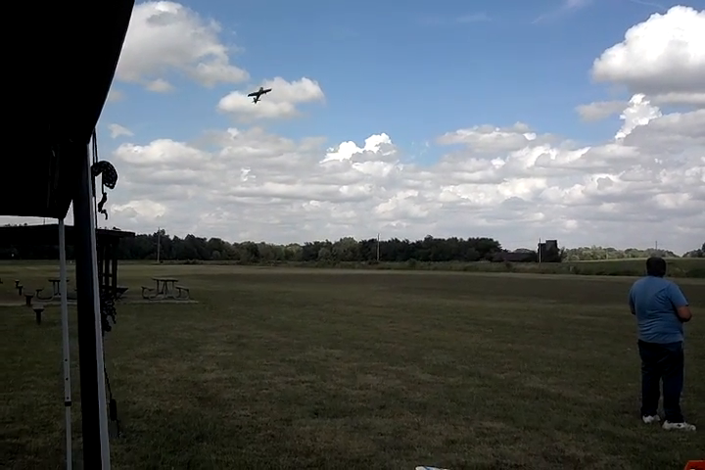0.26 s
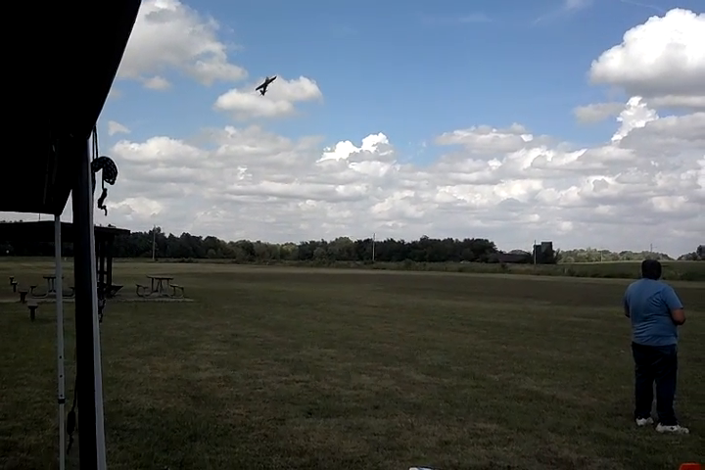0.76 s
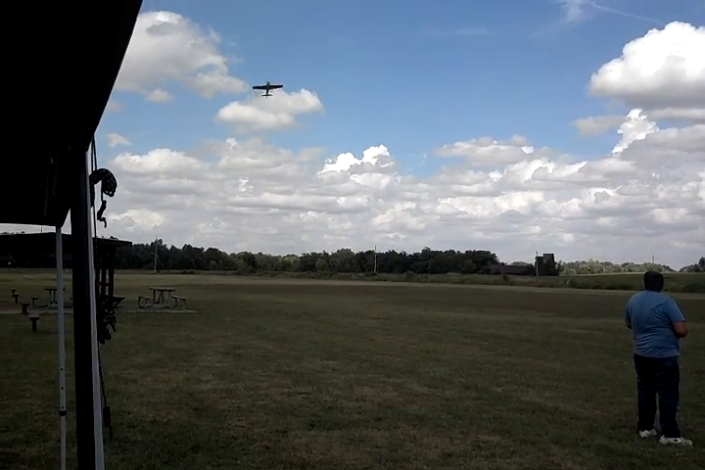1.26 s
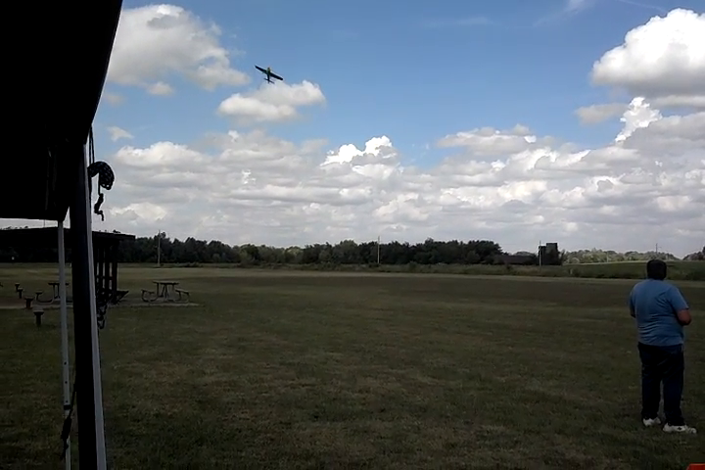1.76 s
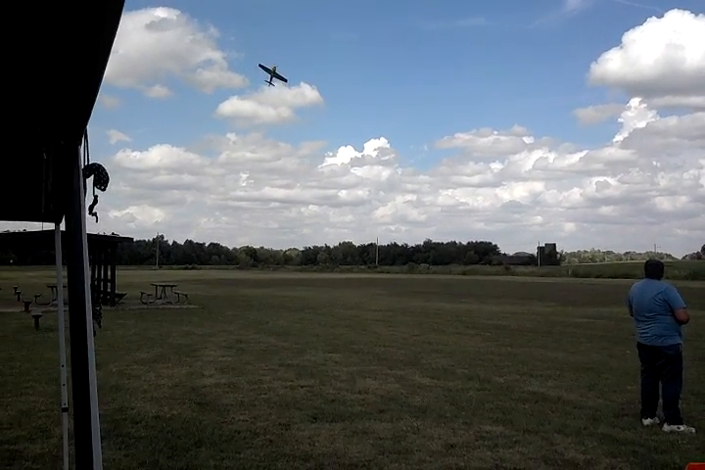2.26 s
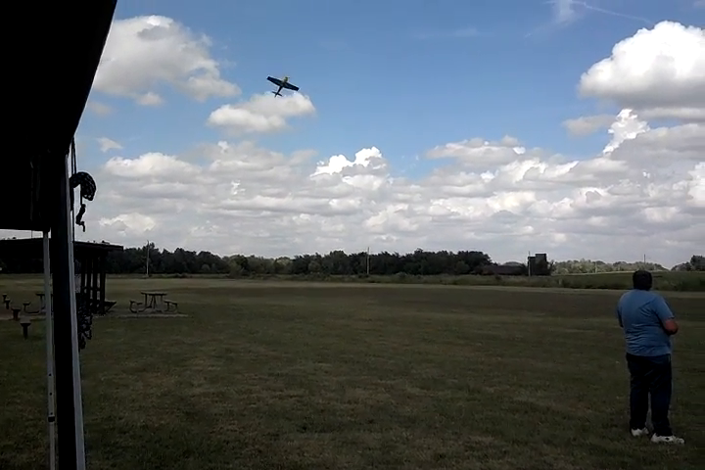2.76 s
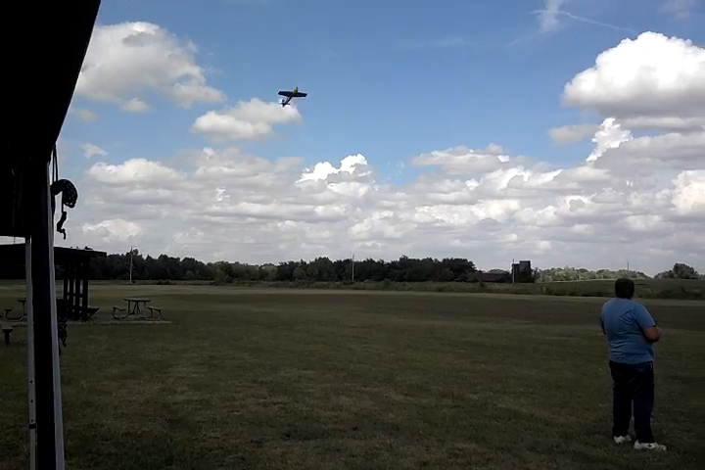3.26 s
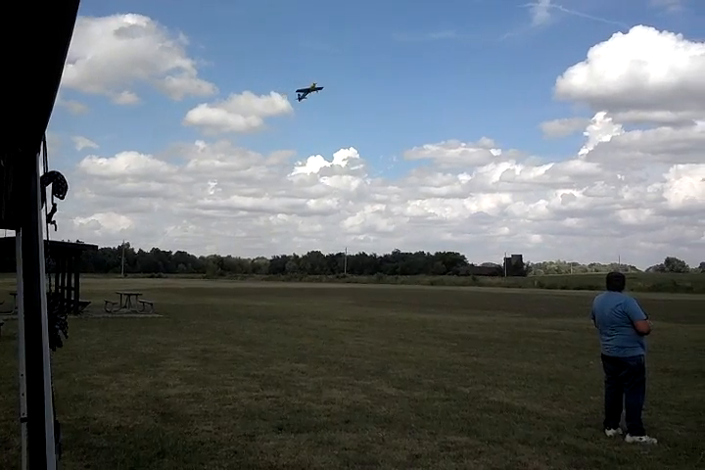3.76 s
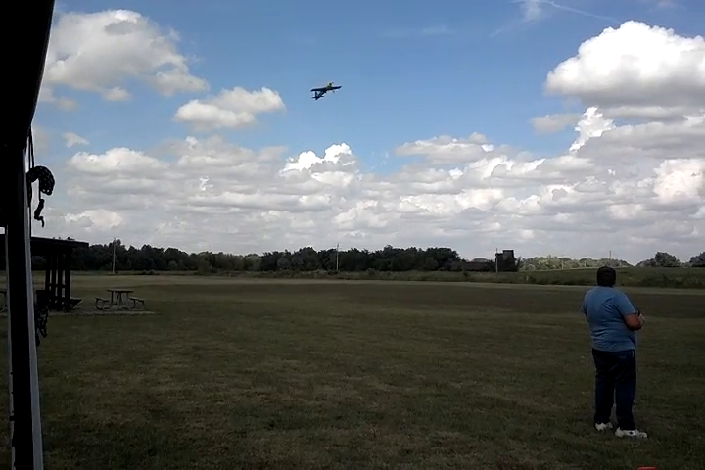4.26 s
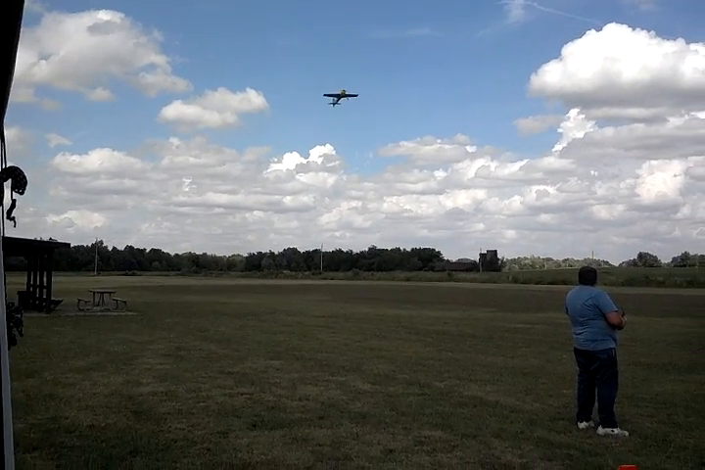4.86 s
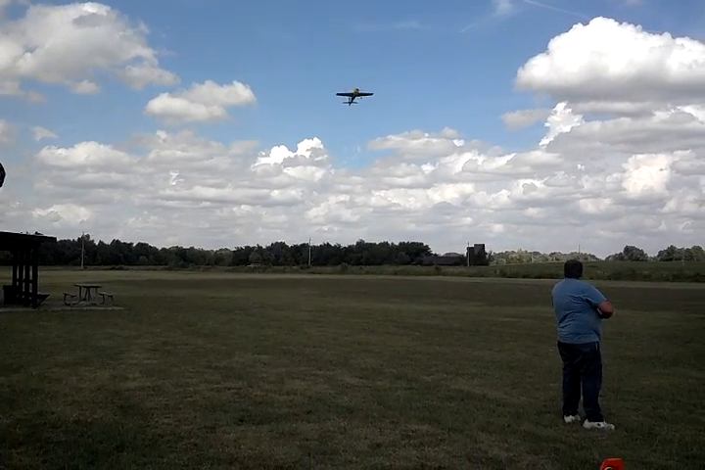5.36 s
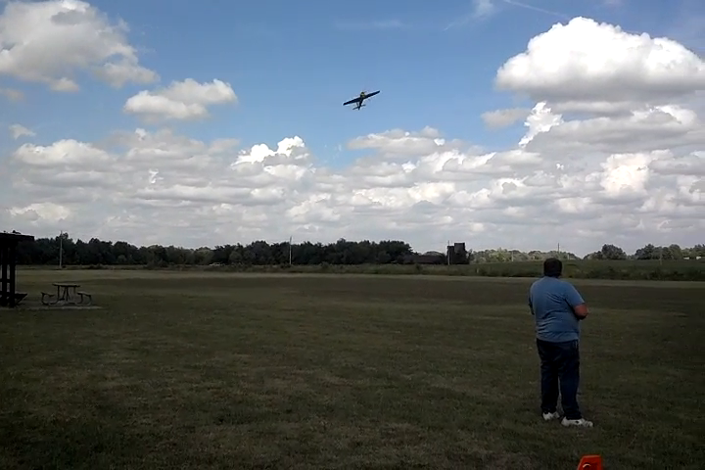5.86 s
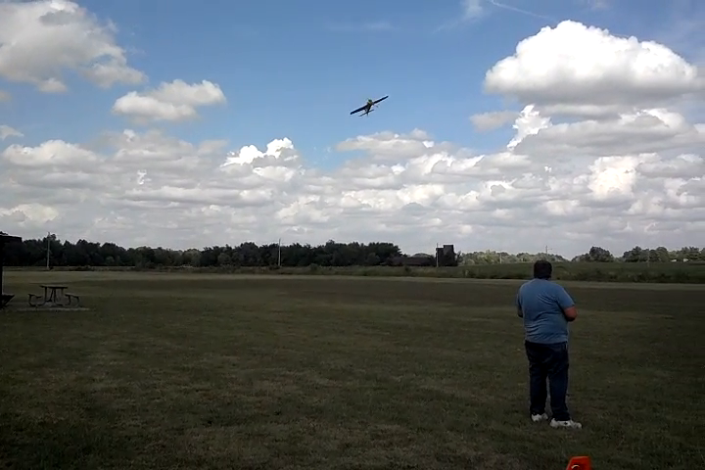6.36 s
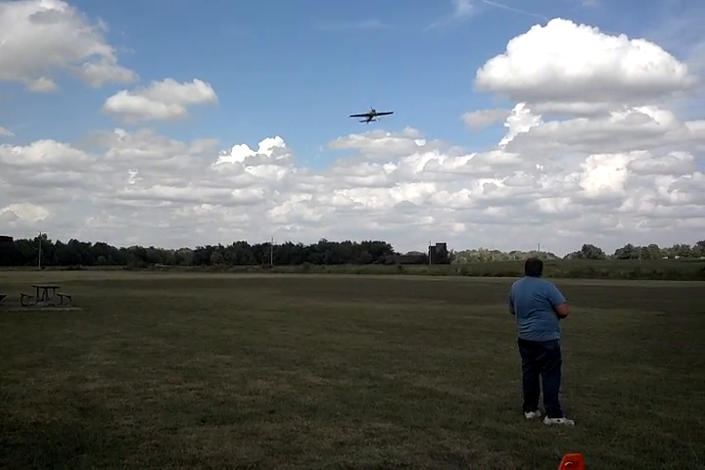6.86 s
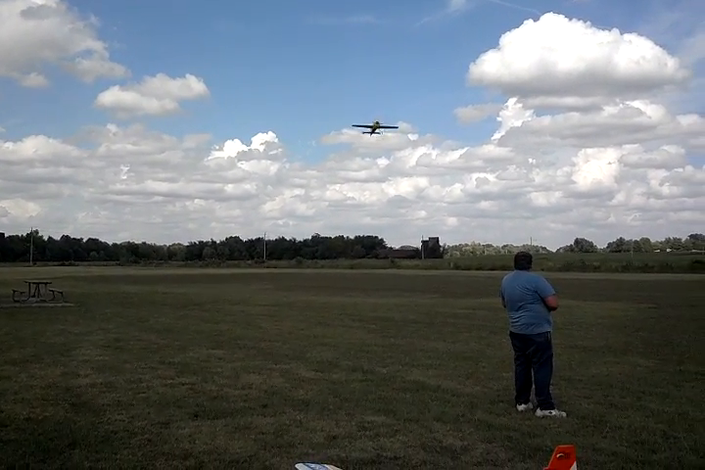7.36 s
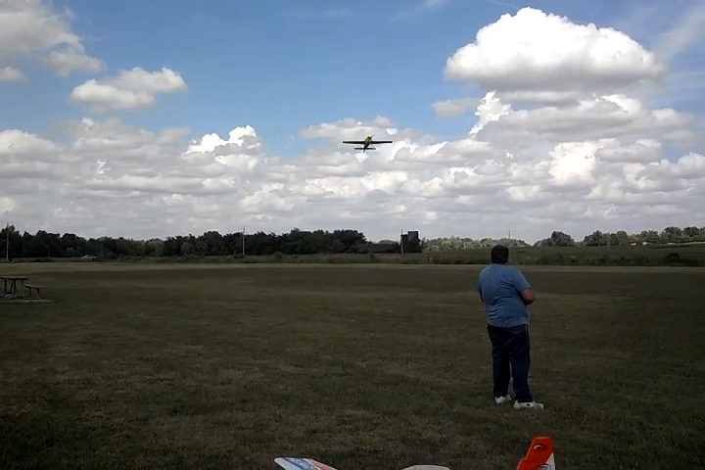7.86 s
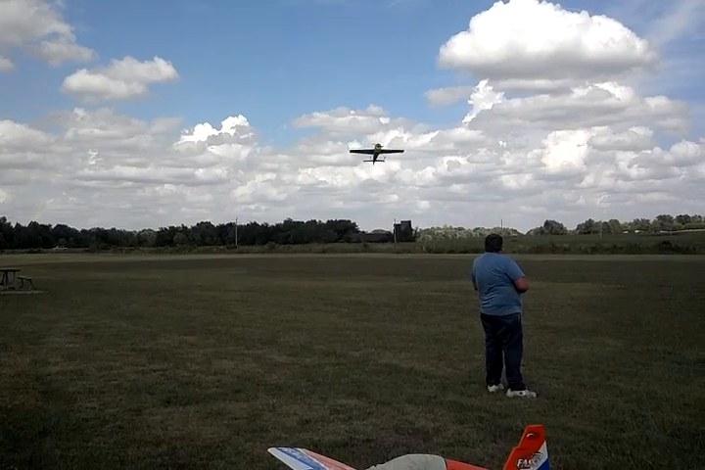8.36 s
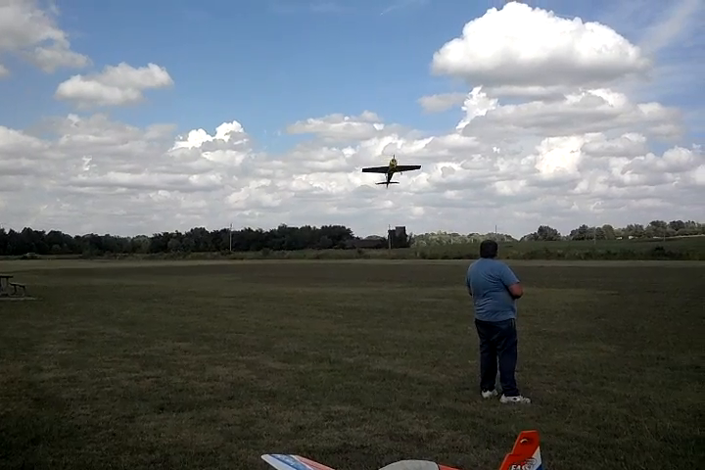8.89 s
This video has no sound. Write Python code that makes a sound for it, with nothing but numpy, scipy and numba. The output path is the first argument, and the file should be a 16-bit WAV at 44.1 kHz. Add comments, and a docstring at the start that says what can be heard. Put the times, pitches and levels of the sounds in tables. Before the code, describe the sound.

A large model airplane's gasoline engine buzzes overhead, revving up and down, while gusts of wind thump on the microphone.

```python
"""A buzzing petrol engine, revving up and down, with wind thumping on the right.
A large model plane hangs over a field and drifts closer while the throttle is blipped.
Each firing rings the exhaust and spits gas; off throttle some firings come harder than the rest.
Gusts buffet the right port of a camera whose two microphones are cross-fed; its gain control
ducks under each big buffet. Faint hiss throughout, one thin squeak at 4 s."""
import sys
import numpy as np
from scipy import signal
from scipy.io import wavfile
from scipy.ndimage import uniform_filter1d
from numba import njit

SR = 44100
rng = np.random.default_rng(int(sys.argv[2]) if len(sys.argv) > 2 else 0)


def output_pcm(signal):
    """Save a mono or channel-first signal as 16-bit PCM at the path in sys.argv[1].

    Samples are clipped to [-1, 1] before scaling.
    """
    pcm = np.clip(np.atleast_2d(signal).T, -1, 1) * 32767
    wavfile.write(sys.argv[1], SR, np.round(pcm).astype(np.int16))


N = 402633


def undb(db):
    """Decibels to gain."""
    return 10 ** (np.asarray(db) / 20)


def unit(x):
    """Scale to rms 1."""
    return x / np.sqrt(np.mean(x ** 2))


def curves(table):
    """Interpolate each column over the first (seconds), one value a sample."""
    times_s, *columns = np.transpose(table)
    return [np.interp(np.arange(N) / SR, times_s, column) for column in columns]


def held_noise(samples):
    """Gaussian values, each held for this many samples."""
    return np.repeat(rng.standard_normal(N // samples + 1), samples)[:N]


def lowpass(x, hz, order):
    """Butterworth low-pass."""
    return signal.sosfilt(signal.butter(order, hz, fs=SR, output="sos"), x)


def highpass(x, hz, order):
    """Butterworth high-pass."""
    return signal.sosfilt(signal.butter(order, hz, "high", fs=SR, output="sos"), x)


def delay(x, samples):
    """Fractional delay."""
    return np.interp(np.arange(N) - samples, np.arange(N), x)


@njit
def bandpass(x, hz, width_hz):
    """State-variable band-pass, gain 1 at its moving centre."""
    y, band, low = np.empty(len(x)), 0., 0.
    for i in range(len(x)):
        g, damping = np.tan(np.pi * hz[i] / SR), width_hz / hz[i]
        v = (band + g * (x[i] - low)) / (1 + g * (g + damping))
        band, low = 2 * v - band, low + 2 * g * v
        y[i] = damping * v
    return y


def modes(x, table, pitch, passes=1):
    """Sum of resonances, centres scaled by pitch, gains divided by the root of the width."""
    out = 0
    for hz, width_hz, db in table:
        y = x
        for _ in range(passes):
            y = bandpass(y, hz * pitch, float(width_hz))
        out = out + undb(db) / np.sqrt(width_hz) * y
    return out


def clicks(at, size):
    """Impulses at fractional sample positions, each split between two samples."""
    out, i = np.zeros(N + 2), np.clip(at, 0, N).astype(int)
    np.add.at(out, i, size * (1 - at % 1))
    np.add.at(out, i + 1, size * (at % 1))
    return out[:N] + 1e-18


def firings(beat_turns=.47, jitter_s=.000015):
    """One pulse a shaft turn, then a weaker beat; more uneven while the shaft slows."""
    # Shaft speed. Each row: time in seconds, turns a second.
    shaft = [(0, 72), (.2, 72.5), (.43, 65.2), (.54, 63.9), (.67, 62.5), (.91, 62.3), (1.04, 57.6),
             (1.22, 54.43), (1.42, 57.42), (1.73, 53.82), (1.94, 54.5), (2.13, 49.3), (2.54, 46.5),
             (2.75, 46.85), (2.97, 54.25), (3.12, 58.47), (3.36, 59.94), (4.2, 60.71), (4.83, 61.18),
             (5.11, 56.52), (5.52, 55.02), (5.77, 56.13), (6.2, 55.83), (6.51, 46.27), (6.94, 48.77),
             (7.6, 49.1), (8.01, 54.8), (8.09, 57.7), (8.24, 64.4), (8.39, 69.5), (8.45, 70), (8.54, 68.4),
             (8.61, 62.2), (8.7, 55.04), (8.98, 46.8), (9.13, 47.3)]
    # Timed firings: ordinary ones that keep the beat, and harder bangs off throttle.
    # Each row: time in seconds, dB over a full-strength firing.
    timed = [(1.067, 5), (1.139, 6), (1.759, 5), (1.871, 5), (2.001, 5), (2.118, 4), (2.322, 5), (2.406, 6),
             (2.449, 7), (2.492, 6), (2.577, 5), (3.912, 0), (5.806, 0), (6.234, 5), (6.367, 6), (6.535, 5),
             (6.577, 5), (7.484, 1), (7.686, 1), (7.802, 1), (7.989, 0), (8.18, 0), (8.581, 4), (8.629, 3),
             (8.646, 5), (8.697, 6), (8.751, 6), (8.807, 3), (8.865, 7), (8.905, 7), (8.966, 4), (9.007, 5),
             (9.049, 5), (9.113, 5)]
    # Second beat, stronger at low speed. Each row: shaft speed in Hz, share of a full firing.
    beat = [(48, .3), (56, .15)]
    shaft_hz, = curves(shaft)
    slowing_hz_per_s = uniform_filter1d(-np.gradient(shaft_hz) * SR, size=4000)
    shortfall_db = np.interp(slowing_hz_per_s, [0, 40], [1, 3.5])
    beat_share = np.interp(shaft_hz, *np.transpose(beat))
    turns = np.cumsum(shaft_hz) / SR
    # bend the phase so that timed firings fall on whole turns
    timed_s, timed_db = np.transpose(timed)
    timed_phase = np.interp(timed_s * SR, np.arange(N), turns)
    timed_turn = np.cumsum(np.round(np.diff(timed_phase, prepend=0)))
    turns += np.interp(np.arange(N), timed_s * SR, timed_turn - timed_phase)
    whole = np.arange(1, int(turns[-1]) + 1)
    fire_at = np.interp(whole, turns, np.arange(N))
    beat_at = np.interp(whole + beat_turns, turns, np.arange(N))
    weakness, fire_jitter, beat_jitter, beat_db = rng.standard_normal((len(whole), 4)).T
    size_db = -shortfall_db[fire_at.astype(int)] * abs(weakness)
    size_db[timed_turn.astype(int) - 1] = timed_db
    beat_size = beat_share[fire_at.astype(int)] * undb(beat_db)
    pulses = clicks(fire_at + jitter_s * SR * fire_jitter, undb(size_db))
    pulses += clicks(beat_at + jitter_s * SR * beat_jitter, beat_size)
    return pulses / np.sqrt(shaft_hz)


def exhaust(pulses, pitch, boom_db, bark_db, round_trip_s=.00195, low_lag_s=.0003, muffler_hz=1930):
    """Each pulse bangs and rings the pipe; the muffler takes off the treble."""
    # Resonances. Each row: centre in Hz, width in Hz, gain in dB.
    boom_modes = [(156, 51, 17), (241.5, 63, 11.5), (355.7, 44, 17.5)]  # pipe, low
    bark_modes = [(531, 14, 0.96), (632, 87, 3.1), (750, 100, 0.44), (860, 52, 1)]  # pipe, middle
    ring_modes = [(1227, 90, -5), (1670, 69, 7)]  # pipe, high
    flank_modes = [(1440, 66, -2.5), (1805, 220, -10.5), (2031, 30, -0.5)]  # weaker, beside the ring
    bang_modes = [(330, 180, 11.4), (730, 900, 1.6), (1595, 143, 8.45)]  # bare bang: thud, knock, snap
    # Flanking modes. Each row: time in seconds, gain in dB.
    flank_gain = [(0, 9), (.6, 7.5), (1.2, -3), (2.7, -1), (4.6, 0), (6.2, -3), (7.6, 3), (8.2, 6.5),
                  (8.5, -7.5)]
    # How squarely the exhaust faces the camera. Each row: time in seconds, bang in dB, pipe in dB.
    facing = [(0, 8, -6), (.5, -4, 6.5), (2.7, -10, 2), (3.6, -44, 3.5), (4.6, -22, 4.5), (5.2, -18, 3),
              (6.2, 0.5, 4), (7, 6.5, -2.5), (7.6, 6.5, -2), (8.15, 0.5, 0.5), (8.35, 2, 0), (8.55, 2.5, 6),
              (9.13, 15.5, 13.5)]
    flank_db, = curves(flank_gain)
    bang_db, pipe_db = curves(facing)
    # the pulse returns inverted from the open end
    in_pipe = pulses - .2 * delay(pulses, round_trip_s * SR / pitch)
    boom = undb(boom_db) * modes(in_pipe, boom_modes, pitch)
    bark = undb(bark_db) * modes(in_pipe, bark_modes, pitch)
    ring = modes(in_pipe, ring_modes, pitch) + undb(flank_db) * modes(in_pipe, flank_modes, pitch)
    thud = modes(pulses, bang_modes[:-1], pitch)
    snap = modes(pulses, bang_modes[-1:], pitch)
    low = undb(pipe_db) * (bark + boom) + undb(bang_db) * thud
    high = undb(pipe_db) * ring + undb(bang_db) * snap
    # low modes follow the snap, rounded and in opposite sense
    low = delay(lowpass(low, hz=900, order=1), low_lag_s * SR)
    return lowpass(high - low, muffler_hz, order=4) / np.std(ring)


def gas_flow(pulses, rise_s=.0011, decay_s=.0014, steady=.47):
    """Envelope: a puff of random strength after each pulse, over a steady flow."""
    puffs = pulses * undb(4.2 * held_noise(256))
    for tau_s in (rise_s, decay_s):
        puffs = signal.lfilter([1], [1, -np.exp(-1 / (tau_s * SR))], puffs)
    return unit(uniform_filter1d(puffs, size=150)) + steady


def gas_hiss(flow, pitch):
    """Spitting gas: broad bands of noise that follow the flow."""
    # Noise bands. Each row: centre in Hz, width in Hz, gain in dB.
    bands = [(720, 390, 7.2), (1245, 255, 9), (2170, 1690, 9.36), (3370, 720, 4.6), (4170, 2890, 10.6),
             (6910, 5300, 4.5), (14250, 16500, 6.1)]
    return unit(flow * modes(rng.standard_normal(N), bands, pitch, passes=2))


def firing_ticks(pulses, pitch):
    """A dry tick of random strength on each pulse."""
    # Tick resonances. Each row: centre in Hz, width in Hz, gain in dB.
    tick_modes = [(3560, 170, -0.5), (4284, 260, 8.5)]
    strikes = pulses * (1 + .45 * held_noise(128))
    return unit(modes(strikes, tick_modes, pitch, passes=2))


def engine(hollow_hz=1039, hollow_width_hz=350., hollow_depth=.88, right_lag_samples=2.8):
    """Exhaust, ticks and gas at the two ports, coloured by the plane's attitude."""
    # Engine loudness. Each row: time in seconds, gain in dB.
    loudness = [(0, -41), (.2, -28.5), (.5, -36.5), (.91, -36), (1.04, -37), (1.42, -31), (1.73, -35),
                (1.94, -37), (2.13, -38), (2.54, -38), (2.75, -26.5), (2.97, -21), (3.36, -27.5),
                (4.2, -26), (4.83, -28.5), (5.52, -25), (6.2, -29.5), (6.51, -35.5), (6.94, -29.5),
                (7.6, -25), (8.01, -22.5), (8.15, -14.5), (8.39, -14), (8.54, -18), (8.7, -27.5),
                (9.13, -44.5)]
    # Attitude. Each row: time in seconds, boom, bark and gas gains in dB, pitch factor of the modes.
    attitude = [(0, 7, -9, 5, 1.08), (.22, -7.5, -12, -8, 1.044), (.5, -7.5, -2, -8.5, 1.065),
                (1.4, -6.5, -17, -14.5, 1.005), (1.9, -4.5, -7, -8.5, 1), (2.5, 1.5, -1, -2.5, 0.98),
                (2.9, -7.5, -14, -16.5, 1.014), (3.5, -3.5, -3, -11.5, 0.98), (4.2, -5, -4, -5, 1.012),
                (4.6, -8.5, -6.5, -11.5, 1.02), (5.2, -12.5, -7, -15, 1.004), (6.2, -7.5, -17, -13, 1.017),
                (6.6, -7, -7, -5.5, 1), (7.3, -9, 0, -11.5, 0.98), (7.73, -4, -39, -4, 1.01),
                (8, -12, -9, -15, 1.023), (8.3, -8, -3, -5.5, 0.984), (8.6, -26.5, -4.5, -7.5, 1.015),
                (9.13, -6.5, 6, 8.5, 0.99)]
    level_db, = curves(loudness)
    boom_db, bark_db, gas_db, pitch = curves(attitude)
    pulses = firings()
    flow = gas_flow(pulses)
    tone = exhaust(pulses, pitch, boom_db, bark_db) * undb(level_db - 5.5)
    ticks = firing_ticks(pulses, pitch) * undb(level_db + gas_db - 7.5)
    gas_gain = undb(level_db + gas_db - 3.5)
    gas_both, gas_left, gas_right = (gas_hiss(flow, pitch) * gas_gain for _ in range(3))
    common = tone + ticks + 1.37 * gas_both
    common -= hollow_depth * bandpass(common, hollow_hz * pitch, hollow_width_hz)
    # the right port hears more bass, less treble
    shaded = undb(2) * lowpass(common, hz=1050, order=1) + undb(-15) * common
    return np.array([common + 1.2 * gas_left, delay(shaded, right_lag_samples) + 1.2 * gas_right])


def shelter(x, t60_s=.09, echo_db=-8):
    """Add short scattered echoes from a nearby roof and posts, different at each port."""
    t = np.arange(int(t60_s * SR)) / SR
    tail = rng.standard_normal((2, len(t))) * np.exp(-np.log(1000) * t / t60_s) * (t > .002)
    return x + undb(echo_db) * signal.oaconvolve(x, unit(tail) / np.sqrt(len(t)), axes=1)[:, :N]


def eddy(hz, phase_turns, width_cycles, crack=0.):
    """A short pressure swing, steeper in front, with an optional crack on its crest."""
    cycles = np.arange(-2 * SR / hz, 3 * SR / hz) / SR * hz
    swing = np.cos(2 * np.pi * (cycles + phase_turns))
    crest = np.exp(-(cycles / .2) ** 2) * np.cos(2 * np.pi * (3 * cycles + phase_turns))
    window = np.exp(-(cycles / (width_cycles * np.where(cycles < 0, .6, 1.1))) ** 2)
    return window * (swing + crack * crest)


def gust_db(breeze_db=-25.5, swell_db_per_s=192, lull_db_per_s=106):
    """Wind envelope: each gust swells, holds and dies into the breeze."""
    # Gusts. Each row: start in seconds, hold in seconds, level in dB.
    gusts = [(0, 0.49, -9), (0.75, 0.16, -10.5), (1.32, 0.012, -18), (1.62, 0.23, -11.5),
             (1.998, 0.073, -4), (2.217, 0.26, -4), (4.57, 0.061, -27), (4.657, 0.14, -7.5),
             (4.897, 0.08, -10.5), (5.113, 0.0083, 2), (5.316, 0.012, 2.5), (5.44, 0.31, -8.5),
             (6.045, 0.18, -12.5), (6.27, 0.21, -14), (6.525, 0.032, -3.5), (6.702, 0.32, -4),
             (7.07, 0.39, -9.5), (7.734, 0.1, -11.5), (8.126, 0.04, -7), (8.318, .02, -10),
             (8.624, 0.62, -15)]
    t = np.arange(N) / SR
    db = np.full(N, breeze_db)
    for start_s, hold_s, top_db in gusts:
        below_db = np.maximum(swell_db_per_s * (start_s - t), lull_db_per_s * (t - start_s - hold_s))
        db = np.maximum(db, top_db - np.maximum(below_db, 0))
    return db


def wind_patter(band_hits_per_s=60, spread_db=5, left_db=-16):
    """Small eddies hit the ports in bursts that swell with the gusts."""
    ports = np.zeros((2, N))
    for port in ports:
        for hz, db in ((115, 1.5), (170, -1.5), (270, -2), (430, -14.5), (750, -22)):
            when, sign, size = rng.random((int(band_hits_per_s * N / SR), 3)).T
            extra_db = np.minimum(-spread_db * np.log(1 - size), 11)
            hits = clicks(when * N, np.sign(sign - .5) * undb(db + extra_db))
            swing = eddy(hz, phase_turns=.048, width_cycles=.65)
            port += signal.oaconvolve(hits, swing, "same") * np.sqrt(hz / 110)
    burst_db = 3.4 * uniform_filter1d(held_noise(1300), size=500)
    return unit(ports * undb(burst_db)) * undb(gust_db() + np.array([[left_db], [0]]))


def wind_buffets(flap_s=.00342, flap_spread_s=.004):
    """Big eddies pop on the right port; each flaps once more, weaker."""
    # Buffets. Each row: time in seconds, level in dB, pitch in Hz.
    buffets = [(0.08, -1, 400), (.164, 5, 280), (0.196, 4.5, 372), (0.269, 9, 267), (.296, 2.5, 340),
               (0.331, -2, 330), (0.379, 5, 337), (0.4, -5, 330), (0.467, 4.5, 403), (0.477, 2.5, 295),
               (.52, -6, 303), (.706, 0.5, 235), (0.77, -6, 318), (0.781, 1, 340), (0.806, -19, 377),
               (0.826, 0.5, 350), (0.849, -0.5, 360), (0.876, -2, 320), (0.891, -3.5, 434), (0.909, 0, 360),
               (1.586, 5, 232), (1.65, -6, 312), (1.703, -21, 345), (1.722, -2.5, 306), (1.761, -10, 295),
               (1.775, 1.5, 254), (1.942, 10.5, 480), (1.947, 12, 517), (1.989, 10.5, 232), (1.998, 8, 268),
               (2.016, 6, 315), (2.217, 8, 307), (2.334, 7, 354), (2.418, 5, 382), (2.435, 7, 296),
               (2.463, 7.5, 346), (2.473, 9.5, 382), (4.644, 3.5, 245), (4.665, 7, 360), (4.755, 5.5, 446),
               (4.812, -1.5, 362), (5.093, 0, 254), (5.11, 4, 197), (5.128, 4.5, 450), (5.15, 8.5, 730),
               (5.302, 7, 430), (5.325, 4, 395), (5.334, 6, 266), (5.444, 7.5, 310), (5.541, 2, 240),
               (5.723, 7, 305), (6.128, -6.5, 394), (6.156, 5, 245), (6.497, -4.5, 232), (6.71, -4.5, 218),
               (6.789, 1, 273), (6.869, 6.5, 246), (6.897, 8, 447), (7.021, 12, 270), (7.189, 8.5, 276),
               (7.323, 4, 228), (7.842, 5, 397), (7.861, 5, 317), (8.147, 8, 332)]
    ports = np.zeros((2, N))
    for at_s, db, hz in buffets:
        phase_turns, wait, weakness = rng.random(3)
        swing = undb(db) * eddy(hz, phase_turns, width_cycles=.44, crack=.056 * undb(.5 * db))
        lag = int((flap_s + flap_spread_s * wait) * SR)
        flap = undb(-6 - 8.2 * weakness) * np.pad(swing, (lag, 0))
        pop = np.pad(swing, (0, lag)) + flap
        start = max(int(at_s * SR - 2 * SR / hz), 0)
        ports[1, start:start + len(pop)] += pop[:N - start]
    return ports


def air():
    """Faint hiss of the field, unrelated at the two ports."""
    return undb(-55) * signal.lfilter([1], [1, -.9], rng.standard_normal((2, N)))


def squeak(ramp_s=.0026):
    """Two thin, scratchy tones, briefly sounding together."""
    # Start in seconds, length in seconds, tones. Each tone: pitch in Hz, level in dB.
    squeak_shape = (4.0, .032, [(5860, -38), (12150, -37)])
    start_s, length_s, tones = squeak_shape
    t = np.arange(N) / SR - start_s
    gate = np.clip(np.minimum(t, length_s - t) / ramp_s, 0, 1)
    scratch = 1 + .5 * unit(uniform_filter1d(rng.standard_normal(N), size=60))
    return gate * scratch * sum(undb(db) * np.sin(2 * np.pi * hz * t) for hz, db in tones)


def gain_control(x, threshold_db=-6.5, attack_s=.0012, recover_db_per_s=7, initial_cut_db=13):
    """Gain drops fast under a peak over the threshold, then recovers at a steady rate."""
    over_db = np.maximum(20 * np.log10(abs(x).max(axis=0) + 1e-9) - threshold_db, 0)
    over_db[0] = initial_cut_db
    recovery_db = recover_db_per_s * np.arange(N) / SR
    cut_db = np.maximum.accumulate(over_db + recovery_db) - recovery_db
    pole = np.exp(-1 / (attack_s * SR))
    smooth_db, _ = signal.lfilter([1 - pole], [1, -pole], cut_db, zi=[pole * cut_db[0]])
    return x * undb(-smooth_db)


def scene():
    """Pressure at the left and right port."""
    plane = shelter(engine())
    wind = lowpass(wind_patter() + wind_buffets(), hz=1500, order=3)
    return plane + wind + squeak() * np.array([[1], [.3]]) + air()


def record(dry, cross_gain=.98, cross_lag_samples=16, top_hz=15800):
    """Camera: inverted cross-feed, gain control between two bass cuts, soft clip, top cut."""
    opposite = np.pad(dry[::-1], ((0, 0), (cross_lag_samples, 0)))[:, :N]
    wide = highpass(dry - cross_gain * opposite, hz=90, order=2)
    ducked = highpass(gain_control(wide), hz=60, order=1)
    top_cut = signal.ellip(10, .2, 80, top_hz, fs=SR, output="sos")
    return signal.sosfilt(top_cut, np.tanh(ducked))


dry = scene()
out = record(dry)
output_pcm(out)
```